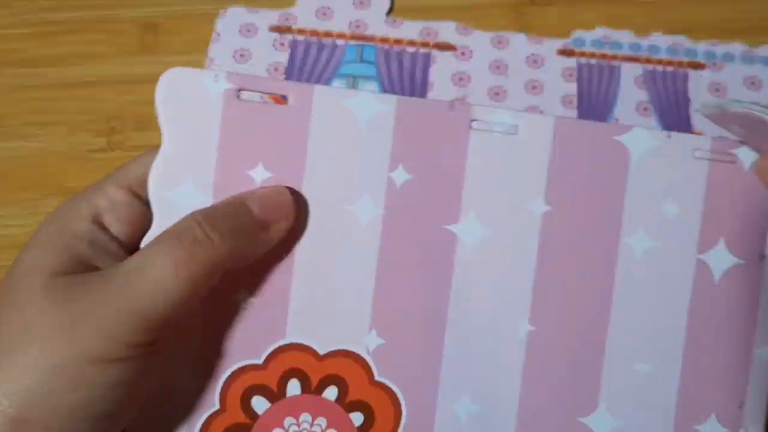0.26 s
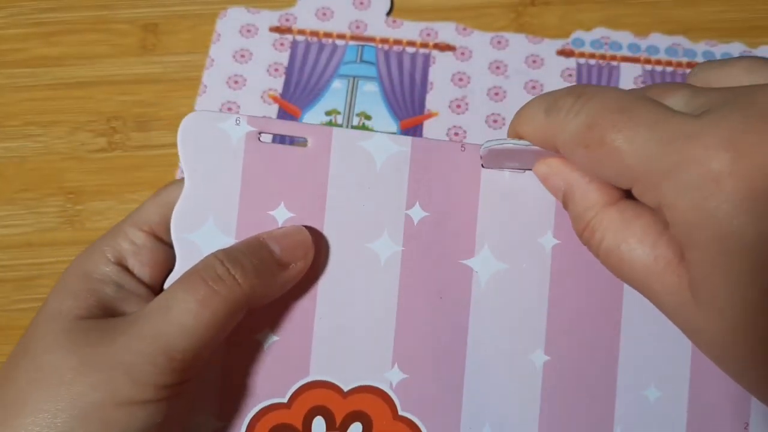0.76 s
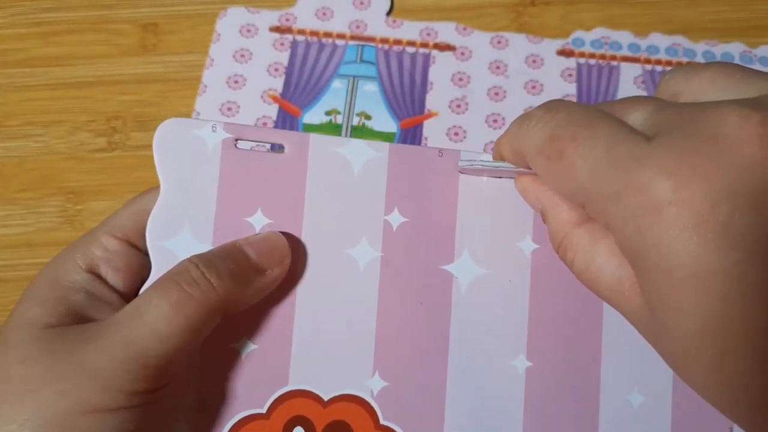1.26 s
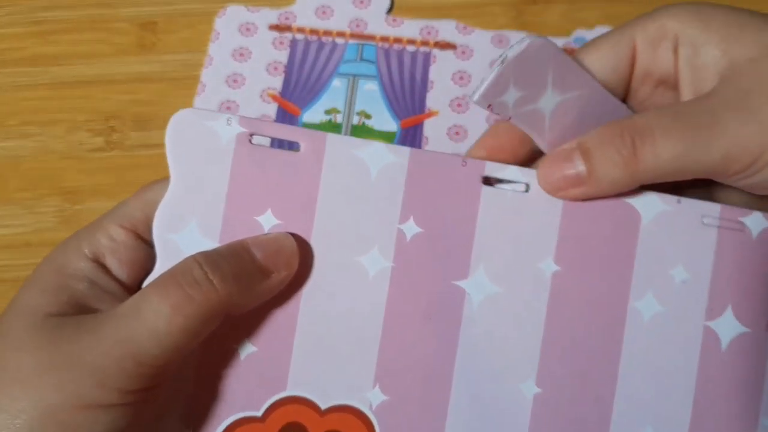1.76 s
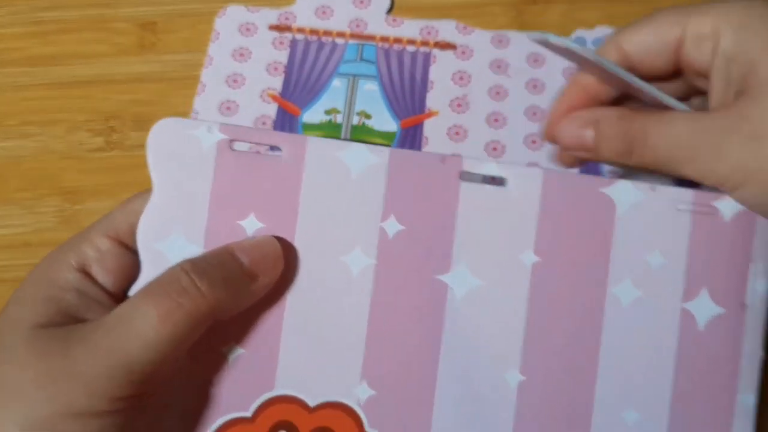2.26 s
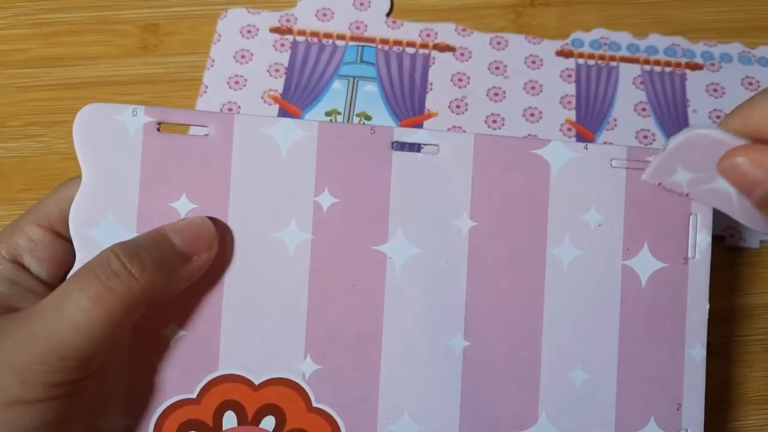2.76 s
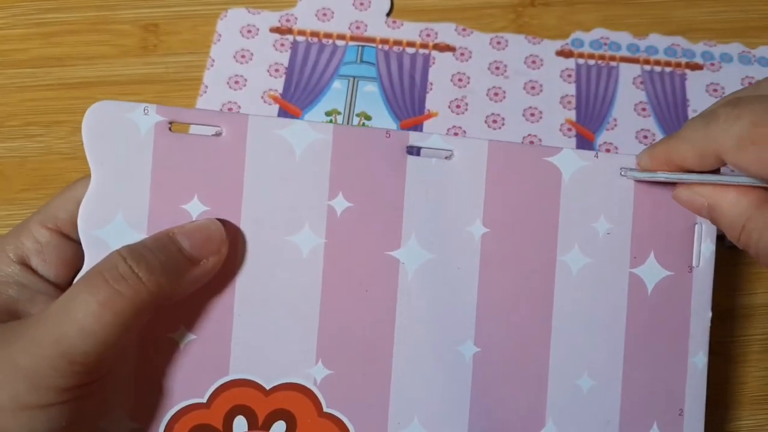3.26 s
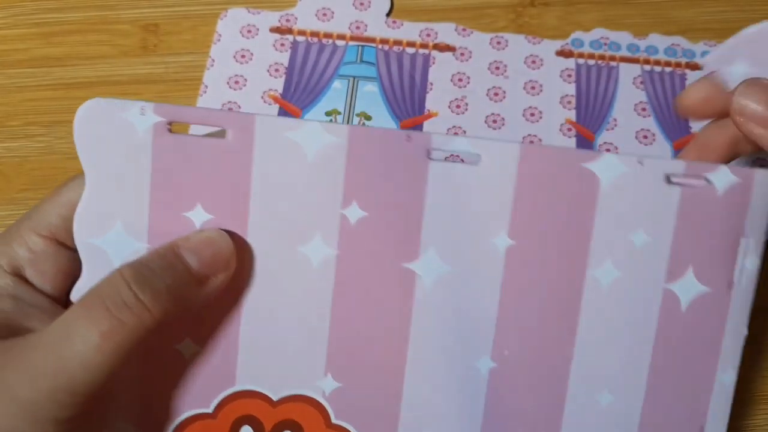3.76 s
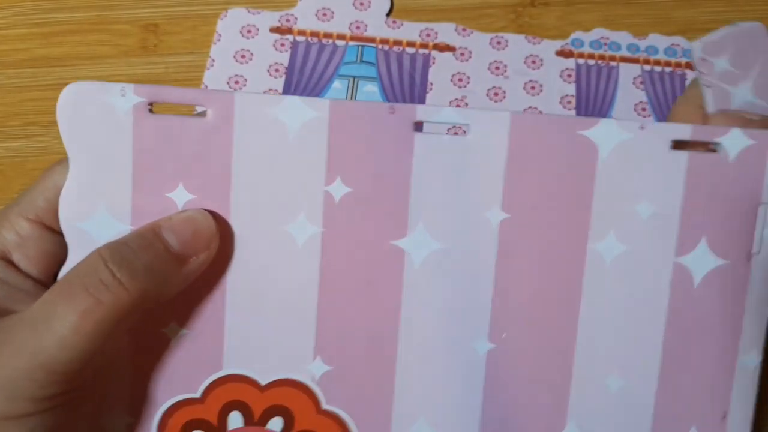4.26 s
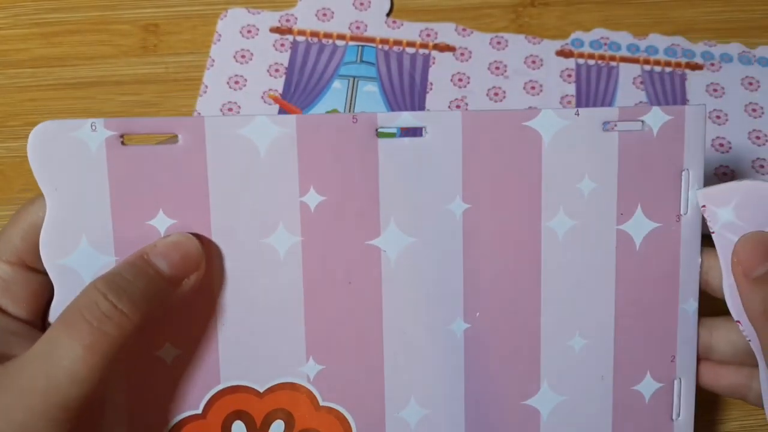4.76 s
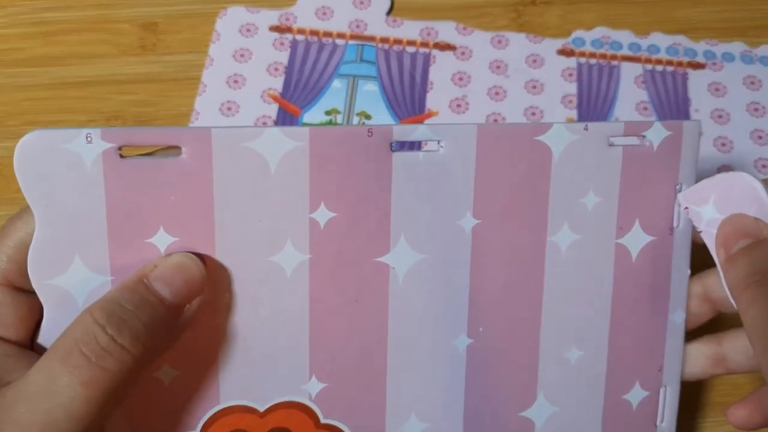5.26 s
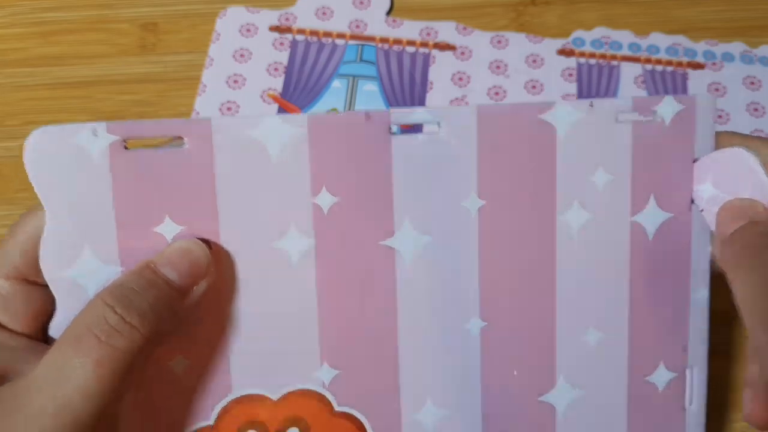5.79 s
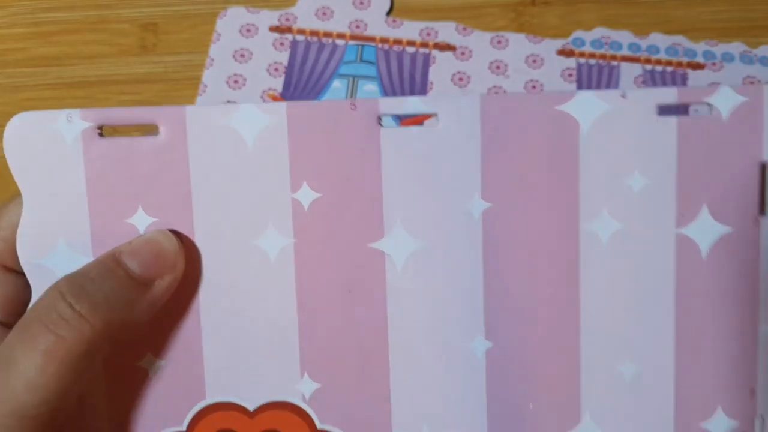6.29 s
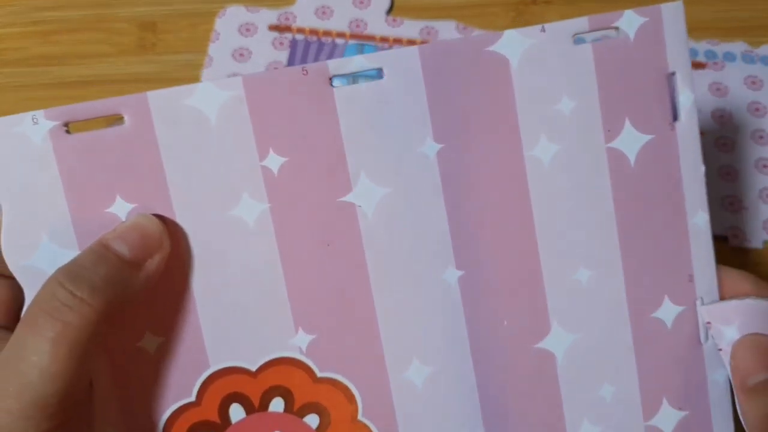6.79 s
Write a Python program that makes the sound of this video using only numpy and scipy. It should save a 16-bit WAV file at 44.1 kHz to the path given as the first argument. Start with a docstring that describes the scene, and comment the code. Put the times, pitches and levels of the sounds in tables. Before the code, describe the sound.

Stiff card tabs are pushed out of a sheet close up, with dry snaps, clicks and faint finger rubbing over low distant traffic rumble.

```python
"""Small die-cut tabs are pushed out of a stiff card sheet held over a table, close to the microphone.
Each push is a noisy burst with a crackle that excites the resonances of the tab and of the sheet.
Fingers rub the card between pushes: grains of noise in clumps, swelling into short scuffs.
A small room answers the card quietly with a short tail of scattered echoes.
Far off, traffic rumbles through the walls: filtered noise and a wavering engine drone, under faint hiss."""
import sys
import numpy as np
from scipy import signal
from scipy.fft import rfft, irfft, next_fast_len
from scipy.io import wavfile
from scipy.ndimage import uniform_filter1d

SR = 44100
rng = np.random.default_rng(int(sys.argv[2]) if len(sys.argv) > 2 else 0)


def bounce(signal):
    """Save signal as a 16-bit WAV file at the path given by the first command-line argument."""
    frames = np.transpose(np.atleast_2d(signal))
    limited = np.clip(frames, -1, 1)
    pcm = np.round(limited * 32767).astype(np.int16)
    wavfile.write(sys.argv[1], SR, pcm)


N = 310023

# Paper bridges cracking close to the microphone; tab to air are levels relative to strength,
# crackle is relative to the peak of the burst:
# start_s, strength_db, tab_pitch_hz, tab_db, weight_db, edge_db, fizz_db, air_db,
# crackle_db, crackle_t60_s, rise_s
BRIDGE_CRACKS = [(.354,-40,1168,3.5,-9,-12,-19,-33.5,-3,0.11,.0045),(.371,-57.5,734,15,1,-2,-7,-23,-1.5,0.054,0.0012),
                 (0.429,-64.5,2700,-8,-5,-9,-24,-30,-16,0.12,0.002),(.545,-44.5,1460,0,-2,1,-15,-25,-5.5,0.082,0.0037),
                 (0.607,-54.5,802,4,-4,-1.5,-19,-24,-7.5,0.13,0.0062),(0.641,-63.5,1300,9,-3,6.5,-12,-19,-7,.1,0.0028),
                 (0.648,-42,674,-2,-21,2,-15,-32,-27,.06,.0007),(.656,-55,2870,5,4,1,-7,-8,-25,.06,0.0016),
                 (.67,-57,2900,9,-5,-3,-11,-17,-5.5,0.058,0.0012),(0.681,-50.5,720,-7,-4,0,-14.5,-22,-11,0.039,0.0015),
                 (0.689,-64.5,806,2,-2,3.5,-14,-22,-8,0.13,0.0027),(1.044,-31,1980,-4,-6.5,-3.5,-13,-19.5,-12.5,0.096,.002),
                 (1.057,-46,660,-5,-7,-18.5,-29.5,-29,-14.5,0.13,0.0018),(1.067,-32,1300,-1.5,-8.5,-1,-22.5,-29.5,-10.5,0.077,0.0019),
                 (1.084,-55,3030,8.5,-7.5,6,-19,-30,-8,0.13,0.0045),(1.142,-34.5,3150,-7,-12,0,-23,-42,-9,0.087,0.0018),
                 (1.18,-74,1520,9.5,-9,7,-28,-32,3,.11,0.0016),(1.203,-56,1540,3,-7,-6.5,-42,-39,-6,0.092,.0024),
                 (1.228,-54,1430,0,-1.5,-2,-46,-44,-3.5,.16,0.00098),(1.251,-55,1320,0.5,-8,4.5,-20.5,-40,-12,0.12,0.0034),
                 (1.359,-67,2600,-5.5,-9.5,-5.5,-23,-28,-4,0.2,.0014),(1.617,-74.5,1046,7,3.5,-6,-14,-15,0,0.16,0.0014),
                 (1.798,-31.5,1336,-2.5,-14,-4.5,-10,-17,-4.5,0.084,0.002),(1.811,-45.5,700,12,-9,1.5,0,-19,-13.5,0.056,0.00089),
                 (1.817,-46.5,1288,4,-1,-1,-12.5,-13,-19.5,.05,0.0021),(1.996,-37,1390,-9,-3,-3.5,-14,-46,-7.5,0.091,0.0031),
                 (2.022,-48.5,1430,-18,-6.5,-2.5,-27,-50,-12,.25,0.0028),(2.036,-38.5,1320,-14,-10,-5,-13,-51,-15,0.13,.0022),
                 (2.05,-44,830,-10,-6.5,-1,-12.5,-42,-4.5,.1,0.0026),(2.385,-31.5,1038,-4.5,-8,-6,-12,-19,-4,0.07,0.0025),
                 (2.401,-40.5,1375,-9,-12.5,-14,-13.5,-40,-6,0.083,0.0011),(2.51,-83,2800,8,-5,2,-3,-18,-4,0.092,.0017),
                 (2.571,-31,2100,-9,-7,-5.5,-40,-63,-10,0.082,.0019),(2.615,-48.5,790,-9,-2,-4,-13,-38,-13,0.13,0.0063),
                 (2.631,-49,1447,0,-2,-5,-13,-37,-4,0.13,0.0024),(2.647,-50,840,4,1.5,-4,-26,-36,-12,0.15,0.0016),
                 (2.858,-59,4300,-2,-13,3,-6,-11,-14,0.11,0.0049),(2.873,-37,4400,10,-6,3,1,-12.5,-13,0.032,.0013),
                 (2.886,-45.5,756,0.5,-7.5,-11.5,-9,-39,-4,0.069,0.0017),(3.046,-57,4400,-4,10,-2.5,6,-31,-26,0.14,0.0023),
                 (3.065,-59.5,724,-1,-3,-5.5,-11,-35,9,0.088,0.0012),
                 (3.217,-48.5,4200,-13,2,-4.5,-12,-49,0.5,0.12,0.0034),(3.238,-40.5,771,-19,-7,-12,-14,-49,-11.5,0.13,0.0015),
                 (3.254,-40.5,1390,-1.5,-1.5,-2,-16,-52,-6.5,0.081,0.0015),(3.274,-40,1764,-5,-6.5,-4,-15.5,-47,-8.5,0.095,0.0024),
                 (3.387,-43,1131,-5,-16,-10.5,-18.5,-35,-12,0.19,0.0011),(3.406,-42.5,4300,-9,-9.5,-4,-6.5,-32,-15,0.11,0.0034),
                 (3.478,-67,834,8,4.5,-1,-5,-21,6.5,0.073,0.00086),(3.621,-62,4000,-0.5,-1.5,-4,-6,-14.5,9,0.09,0.00096),
                 (3.687,-43.5,1167,-2.5,-6.5,-4.5,-3,-17,-7.5,0.089,0.0019),(3.761,-77.5,994,-3,-5,-2,-15,-25.5,0.5,0.26,0.0022),
                 (4.052,-65.5,1043,-9.5,-16,0.5,-14.5,-25,6.5,.075,0.0013),(4.082,-73,2200,5.5,-7,7,-24,-30,-21,.09,.002),
                 (4.101,-71,2410,0.5,-18,6.5,-21,-28,-12,0.12,0.00077),(4.121,-58,2346,-2,-18,7.5,-11.5,-23,0.5,.08,.0015),
                 (4.158,-78,3000,2.5,-12,2,-21,-30,-18.5,.06,0.00083),(4.187,-35,3110,2.5,-7.5,2.5,-9,-19.5,-12.5,0.08,.003),
                 (4.25,-76,2700,2,-5,4,-20,-30,-8,.07,.002),(4.445,-37.5,1741,3,2.5,-2.5,-22.5,-60,-13.5,.1,0.0037),(4.457,-42.5,1639,6.5,-14,0.5,-17,-41.5,-6.5,0.092,0.003),
                 (4.478,-33.5,1760,6,0,-2,-25,-53.5,-8.5,0.086,0.0026),(4.498,-44,1660,11,0,9,-20,-47,-15,0.086,0.0011),
                 (4.504,-52,1700,6.5,10,4.5,-12,-47,-26,0.057,.0019),(4.564,-42.5,1800,-1,-9,-15,-43,-61,-10,.1,0.0029),
                 (4.942,-66.5,1160,-2.5,-12,-17,-17,-39,6.5,0.17,0.002),(4.956,-58.5,974,-5,-15,-4,-20,-35,-5,0.097,0.0026),
                 (5.011,-70.5,1168,0,-12,0,-2,-14,-26,.085,0.0022),(5.035,-72,982,-12,-21,-12,-14,-29,0.5,0.16,.0018),
                 (5.069,-61.5,1565,-5,-17,-6,-15.5,-26,6.5,0.08,0.00077),
                 (5.146,-60,708,-4,-3,0.5,-3,-5.5,-12,.076,0.002),(5.268,-51.5,797,-15,2.5,-11,-10.5,-32,-3,0.08,0.0012),
                 (5.298,-50.5,1970,-7.5,-11,-3,-28,-50,-4.5,.17,0.0025),(5.327,-41,1670,-4.5,-13,-7,-29,-50,-19,.14,0.0018),
                 (5.342,-59.5,4200,2,5,7,-5.5,-37,-6.5,0.1,0.0035),(5.529,-81.5,2522,-4,-2,-7,-10,-18.5,-18,.08,0.0025),
                 (5.758,-37,240,0,-8,-1,-9,-16,-5.5,0.065,0.0023),(5.774,-49,913,4,6.5,0,-1,-12,-21.5,0.11,0.0018),
                 (5.916,-56,1640,-3,-2,-6,-13,-42,7,0.072,0.0028),(5.929,-62,1950,2,2,12,-19,-33,-17,0.15,.001),
                 (5.956,-53.5,1705,3.5,-0.5,-5,-19.5,-48,-7,.15,0.0013),(5.999,-54,1558,1,-17,1,-18,-56,-13,.096,.0018),
                 (6.044,-71,857,-2,-2,4,-4,-14,-24,0.15,0.0012),(6.09,-77.5,3360,1.5,-6.5,-2,-18,-35,-7,0.057,0.0015),
                 (6.521,-49,1121,4,-12.5,-10.5,-15,-30.5,6.5,0.082,.003),(6.769,-56,1110,-5,-9,-8.5,-21,-21,-6,0.073,0.0018)]
# Resonances of the card sheet; levels count within one band: pitch_hz, width_hz (of one pass), level_db
SHEET_MODES = [(200, 170, 0), (340, 340, -5), (458, 120, 2.5), (548, 230, -3.5), (792, 310, 10),
               (1092, 350, 9), (1380, 520, 10), (1630, 760, 8), (2270, 1000, 16), (2950, 500, -9.5),
               (2990, 120, -2.5), (3510, 2160, 0), (4384, 1140, 1.5), (5800, 2100, 8.5), (6860, 1700, 13.5),
               (11200, 4100, 2.5), (15000, 3400, 0)]
# Borders between thump, thud, body, edge, rasp, fizz and air: border_hz
BAND_BORDERS_HZ = (400, 700, 2000, 3500, 5300, 9000)
# Strokes of fingers or tab sliding on the card: middle_s, half_length_s (to 1/e), peak_level_db
SCUFF_STROKES = [(.44, .07, -86), (.72, .15, -90), (1.21, .04, -76), (1.45, .25, -87), (2.378, 0.013, -68),
                 (2.432, 0.14, -90), (2.672, 0.077, -82.5), (3.127, 0.11, -89.5), (3.349, 0.066, -82.5),
                 (3.778, 0.094, -88), (4.1, .1, -83.5), (5.001, 0.12, -95), (5.393, 0.085, -82.5),
                 (5.97, 0.071, -83), (6.11, .05, -82), (6.288, .015, -70), (6.681, .018, -75.5),
                 (6.744, 0.0039, -79), (6.761, 0.17, -85), (6.907, .02, -70)]
# Spectrum shape of the rubbing: pitch_hz, level_db (per Hz, relative)
RUB_SPECTRUM = [(120, -33.5), (200, -1.5), (322, -11), (821, -12), (986, -20.5), (1300, -13.5),
                (1870, -17.5), (3020, -20.5), (4040, -28.5), (5130, -40), (6520, -28), (9400, -49.5),
                (16000, -60.5)]
# Decay of the small room: pitch_hz, t60_s
ROOM_DECAY = [(250, 0.096), (1000, 0.15), (3000, 0.084), (7000, 0.063), (14000, 0.083)]
# Distant traffic, points joined by straight lines:
# time_s, engine_pitch_hz, engine_level_db, rumble_level_db, tyre_wash_level_db, ground_boom_level_db
TRAFFIC_COURSE = [(0, 105.3, -42, -45.5, -72.5, -70.5), (.35, 100.1, -54.5, -52, -74, -51),
                  (.5, 100.1, -49, -49.5, -72, -67), (.85, 101, -47.5, -45.5, -69.5, -56),
                  (1.02, 114.8, -52.5, -42, -69.5, -62), (1.11, 89, -55, -46.5, -73, -52),
                  (1.24, 74.15, -35.5, -44, -77, -38.5), (1.3, 78.3, -60.5, -46, -68, -54),
                  (1.36, 79.45, -34, -42.5, -65, -47), (1.48, 73.66, -42.5, -41.5, -66.5, -43),
                  (1.51, 94.8, -38.5, -42, -67, -44), (1.55, 97, -37, -48.5, -67.5, -45),
                  (1.67, 95.36, -35.5, -47, -66, -45), (1.75, 73.96, -47, -46, -68.5, -47),
                  (1.88, 84.4, -61, -54, -68.5, -54), (2.02, 85.6, -46.5, -44.5, -74, -50),
                  (2.15, 86.5, -36.5, -52, -67.5, -52.5), (2.3, 79, -53, -53, -72.5, -54.5),
                  (2.55, 82, -69, -53.5, -75.5, -60.5), (3.1, 94.9, -52, -54, -72, -57),
                  (3.35, 94, -55, -55, -73.5, -57), (3.8, 96, -63.5, -56, -75, -73),
                  (4.5, 103, -59, -58, -78, -63), (5.1, 92.7, -66.5, -57, -74.5, -65),
                  (5.6, 92, -57, -56.5, -74, -60.5), (6.1, 105, -65.5, -57, -74.5, -68),
                  (6.23, 83.17, -59, -52.5, -73.5, -72), (6.44, 115.8, -49.5, -50.5, -70.5, -67),
                  (6.62, 94.37, -51, -46.5, -69, -64.5), (7.03, 97.6, -54.5, -53, -72.5, -64.5)]
# Spectrum shape of the traffic rumble: pitch_hz, level_db (per Hz, relative)
RUMBLE_SPECTRUM = [(12, -48.5), (20, -17), (80, -1), (119, 0.5), (156, -6.5), (191, -12.5), (233, -24),
                   (255, -39.5), (400, -47), (520, -77.5), (880, -120)]
# Spectrum shape of the tyre wash: pitch_hz, level_db (per Hz, relative)
WASH_SPECTRUM = [(150, -33.5), (250, 1), (407, -12.5), (496, -12.5), (640, -12), (1050, -11.5),
                 (1660, -22.5), (1880, -32), (4000, -48.5), (5200, -70), (8800, -120)]
# Spectrum shape of the microphone hiss: pitch_hz, level_db (per Hz, relative)
HISS_SPECTRUM = [(1180, -32), (2000, 0), (3540, -8.5), (4990, -8), (6730, -8), (14800, -9), (16300, -20)]

LEAD_S = 0.012  # room for the creak ahead of each break
LOUD_DB = -35  # strength of a full snap, the reference for hardness
CREAK_DB, CREAK_SHARE, CREAK_S = -18.5, 0.36, 0.0018  # a tab that crackles more also creaks more
TICK = 0.64  # size of the last fibre's click, scaled by the root of the rise in samples
DAMPING, DAMPING_PER_DB = 0.38, 0.008  # tab width over pitch, for a full snap at 1500 Hz; its growth
THUMP_DB, THUMP_PER_DB = 0.36, -0.07  # thump beside thud; harder breaks thump slightly less
RASP_DB, RASP_SHARE = 2, 0.49  # the rasp lies part of the way from edge to fizz, then is raised
RUB_DB = -96.5  # fingers resting and shifting on the card
ROOM_DB = -18  # room beside the direct sound of the card
HISS_DB, CUT_HZ = -92, 16000  # microphone hiss ahead of the band limit, and that limit


def break_force(t, crackle_db, crackle_t60_s, rise_s):
    """Fibres creak, burst and crackle on; gives burst envelope, crackle envelope and noisy force."""
    after = np.maximum(t, 0)
    burst = (after / rise_s) ** 2 * np.exp(2 - 2 * after / rise_s)
    # the first fibres give way just before the break
    creak = gain_of(CREAK_DB + CREAK_SHARE * crackle_db) * np.exp(-np.abs(t) / CREAK_S)
    decay = gain_of(crackle_db - 60 * (after / crackle_t60_s) ** 1.078)
    crackle = decay * (1 - np.exp(-after / 0.0029)) + creak
    force = burst * grit(count=len(t), spread_db=1.5)
    force += crackle * grit(count=len(t), spread_db=6.5)
    # the last fibre parts in one tick
    force[round((LEAD_S + rise_s) * SR)] += TICK * np.sqrt(rise_s * SR)
    return burst, crackle, force


def sheet_rings(force, after):
    """The force shakes the modes of the sheet, summed into bands from thump to air."""
    bands = np.zeros((len(BAND_BORDERS_HZ) + 1, len(force)))
    for k, (hz, width_hz, level_db) in enumerate(SHEET_MODES):
        band = np.searchsorted(BAND_BORDERS_HZ, hz)
        bands[band] += (-1) ** k * gain_of(level_db) * mode(force, hz, width_hz)
    bands[-1] *= np.exp(-after / 0.019)  # the finest treble comes mostly from the break itself
    return bands


def tab_ring(t, burst, crackle, tab_hz, hard_db):
    """The bent tab springs back in a wave packet with tearing noise; the crackle keeps it ringing."""
    wave = burst * np.sin(2 * np.pi * (tab_hz * t + rng.random()))
    tearing = (burst + 2.4 * crackle) * rng.standard_normal(len(t))
    damping = DAMPING * np.exp(DAMPING_PER_DB * hard_db) * (tab_hz / 1500) ** 0.3
    return mode(wave + tearing, tab_hz, damping * tab_hz)


def crack(strength_db, tab_hz, tab_db, weight_db, edge_db, fizz_db, air_db, crackle_db, crackle_t60_s, rise_s):
    """One breaking bridge drives tab and sheet; their bands are evened, then mixed by level."""
    t = np.arange(SR // 5) / SR - LEAD_S
    hard_db = strength_db - LOUD_DB
    burst, crackle, force = break_force(t, crackle_db, crackle_t60_s, rise_s)
    sheet = sheet_rings(force, np.maximum(t, 0))
    rings = np.vstack([tab_ring(t, burst, crackle, tab_hz, hard_db), sheet])
    # every band gets the energy of the burst and crackle envelopes
    energy = (burst ** 2 + crackle ** 2).sum()
    rings /= np.sqrt((rings ** 2).sum(1, keepdims=True) / energy)
    thump_db = weight_db + THUMP_DB + THUMP_PER_DB * hard_db
    rasp_db = RASP_DB + edge_db + RASP_SHARE * (fizz_db - edge_db)
    # tab, thump, thud, body, edge, rasp, fizz, air
    mix_db = np.array([tab_db, thump_db, weight_db, 0, edge_db, rasp_db, fizz_db, air_db])
    return gain_of(strength_db + mix_db) @ rings


def cracks():
    """All the breaks, each beginning 1.5 ms ahead of its listed start."""
    out = np.zeros(N)
    for start_s, *settings in BRIDGE_CRACKS:
        add(out, start_s - 0.0015 - LEAD_S, crack(*settings))
    return out


def rubbing():
    """Tiny slips in clumps under the sliding fingers, swelling at each scuff."""
    t = np.arange(N) / SR
    level = gain_of(RUB_DB)
    for middle_s, half_s, peak_db in SCUFF_STROKES:
        level = level + gain_of(peak_db) * np.exp(-((t - middle_s) / half_s) ** 2)
    drift = evened(uniform_filter1d(rng.standard_normal(N), 150))
    clumps = gain_of(1.8 * drift)
    return level * coloured(grit(count=N, spread_db=5.0) * clumps, RUB_SPECTRUM)


def room(x):
    """Echoes of the small room: sparse taps of random sign, each band dying at its own speed."""
    taps = np.zeros(SR // 2)
    slots = np.arange(200, len(taps) - 20, 20)
    taps[slots + rng.integers(0, 20, len(slots))] = rng.choice([-1., 1.], len(slots))
    hz, t, z = signal.stft(taps, SR, nperseg=256)
    decay = gain_of(-60 * t / read(ROOM_DECAY, hz)[:, None])
    tail = signal.istft(z * decay, SR, nperseg=256)[1]
    return signal.fftconvolve(x, tail / np.linalg.norm(tail))[:N]


def traffic():
    """Distant vehicles: broad rumble, deep ground boom, gliding unsteady engine drone, tyre wash."""
    drone_hz, drone_db, rumble_db, wash_db, boom_db = follow(TRAFFIC_COURSE)
    waver_noise, rumble_noise, wash_noise, boom_noise = rng.standard_normal((4, N))
    waver = 1 + 0.028 * evened(uniform_filter1d(waver_noise, 3000))
    turns = np.cumsum(drone_hz * waver) / SR + rng.random()
    drone = gain_of(drone_db) * np.sqrt(2) * np.sin(2 * np.pi * turns)
    boom = gain_of(boom_db) * evened(mode(boom_noise, 50.0, 29.0))
    rumble = gain_of(rumble_db) * coloured(rumble_noise, RUMBLE_SPECTRUM)
    wash = gain_of(wash_db) * coloured(wash_noise, WASH_SPECTRUM)
    return boom + drone + rumble + wash


def hiss():
    """Steady microphone hiss: noise filtered to its spectrum."""
    return gain_of(HISS_DB) * coloured(rng.standard_normal(N), HISS_SPECTRUM)


def grit(count, spread_db):
    """Random clicks of widely spread sizes, rms 1."""
    boost_db = spread_db * np.minimum(rng.exponential(1, count), 5)
    return evened(rng.standard_normal(count) * gain_of(boost_db))


def resonate(x, hz, width_hz):
    """Shifts hz down to zero, smooths, and shifts back: a resonance of gain 1."""
    turn = np.exp(2j * np.pi * np.cumsum(hz * np.ones(len(x))) / SR)
    r = np.exp(-np.pi * width_hz / SR)
    return 2 * (turn * signal.lfilter([1 - r], [1, -r], x / turn)).real


def mode(x, hz, width_hz):
    """A resonance applied twice: deep valleys on both sides."""
    return resonate(resonate(x, hz, width_hz), hz, width_hz)


def coloured(x, points):
    """Filters x by a spectrum shape, rms 1."""
    size = next_fast_len(N)
    gains = gain_of(read(points, np.fft.rfftfreq(size, 1 / SR)))
    return evened(irfft(rfft(x, size) * gains, size)[:N])


def read(points, hz):
    """Reads a curve at hz, in straight lines over log frequency."""
    f, value = np.transpose(points)
    return np.interp(np.log(hz + 1), np.log(f + 1), value)


def follow(rows):
    """Columns of a time table at every sample."""
    s, *columns = np.transpose(rows)
    return [np.interp(np.arange(N) / SR, s, c) for c in columns]


def gain_of(db):
    """Amplitude factor of a level in dB."""
    return 10 ** (np.asarray(db) / 20)


def evened(x):
    """Scales x to rms 1."""
    return x / np.sqrt(np.mean(x ** 2) + 1e-20)


def add(mix, start_s, sound):
    """Lays a sound into the mix, cut at its end."""
    part = mix[round(start_s * SR):][:len(sound)]
    part += sound[:len(part)]


def scene():
    """Hands and card in the room, traffic outside."""
    card = cracks() + rubbing()
    return (card + gain_of(ROOM_DB) * room(card) + traffic())[None]


def record(dry):
    """Microphone hiss, then the band limit."""
    lowpass = signal.firwin(255, CUT_HZ, window=("kaiser", 9), fs=SR)
    return signal.oaconvolve(dry + hiss(), lowpass[None], "same")


dry = scene()
out = record(dry)
bounce(out)
```